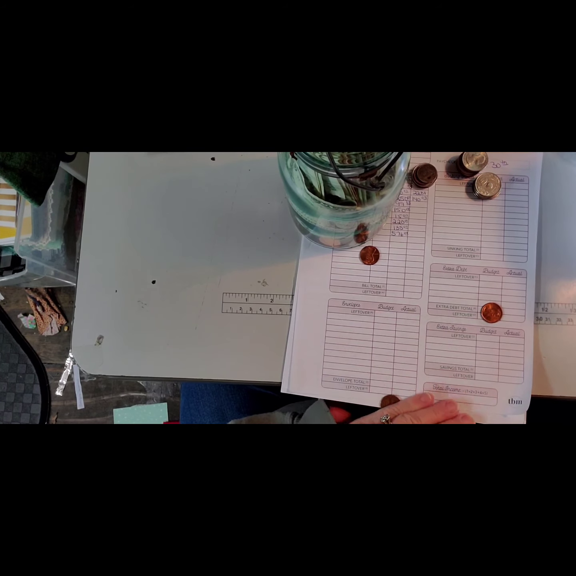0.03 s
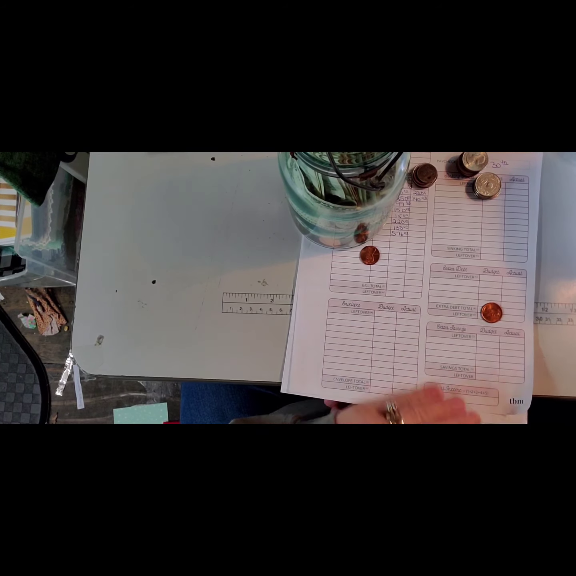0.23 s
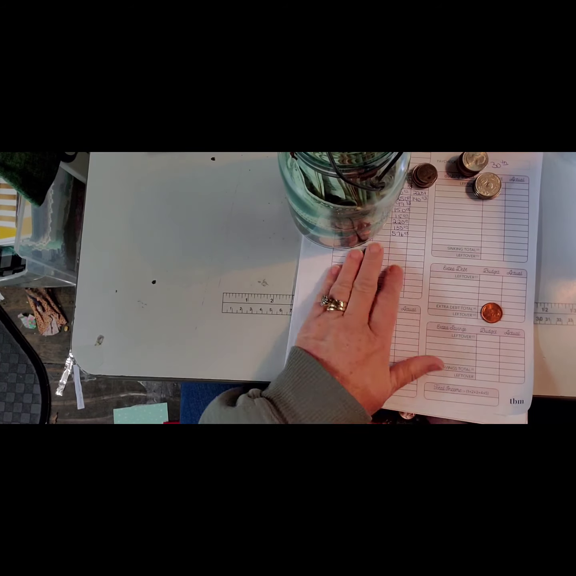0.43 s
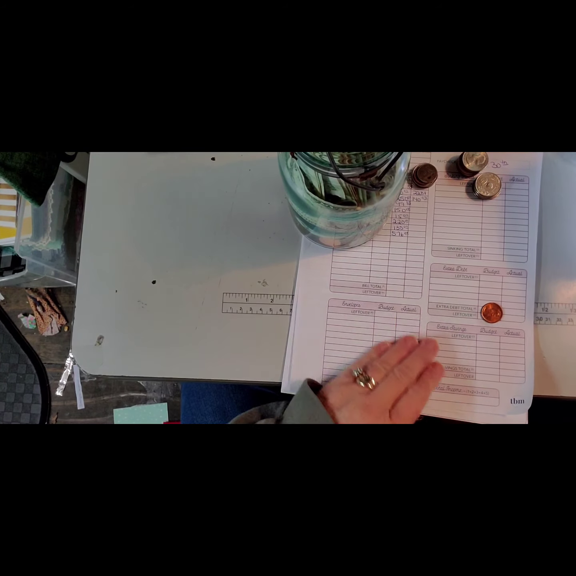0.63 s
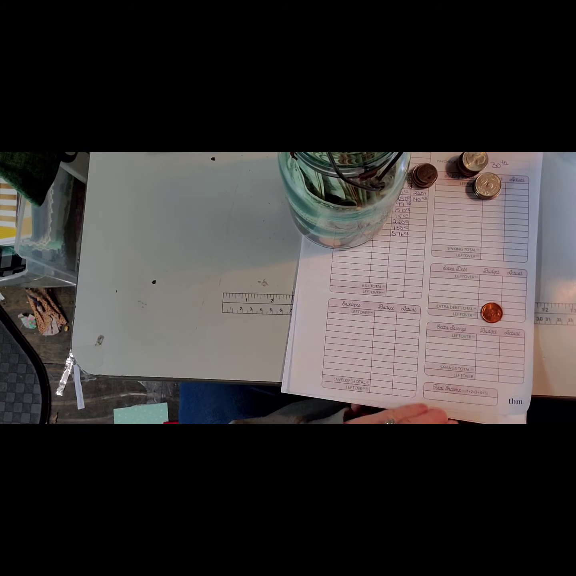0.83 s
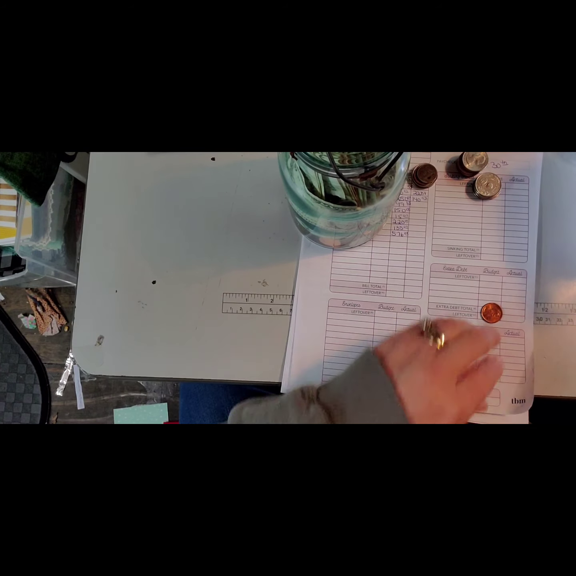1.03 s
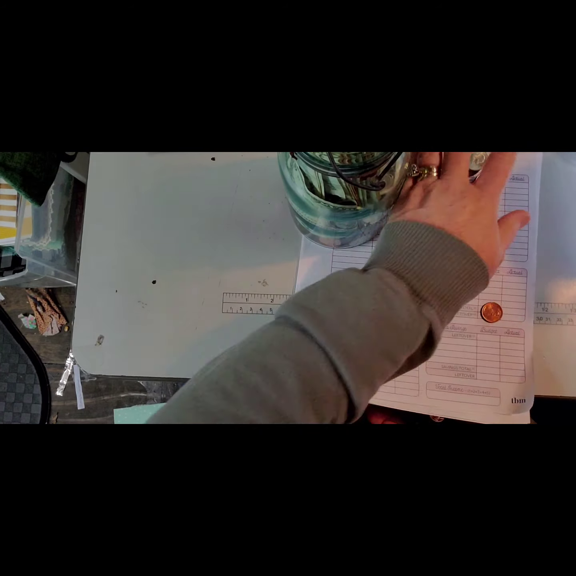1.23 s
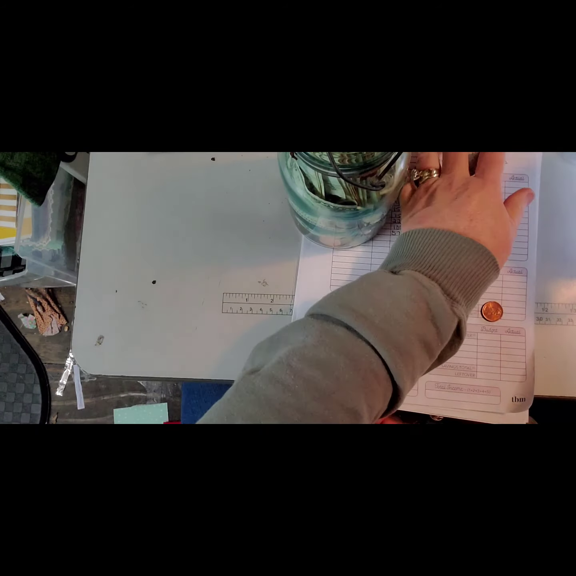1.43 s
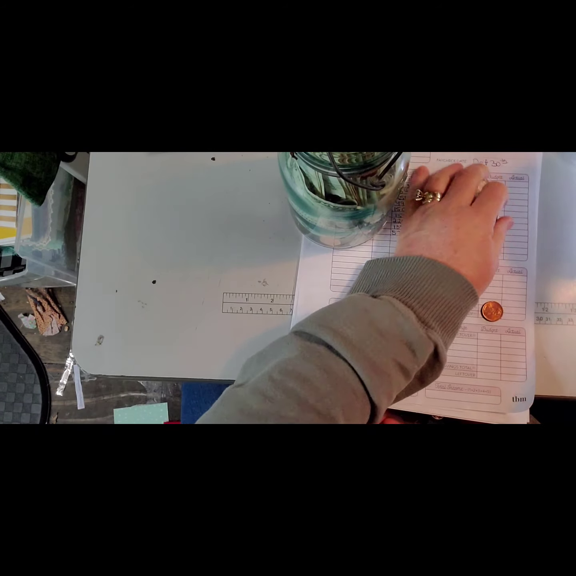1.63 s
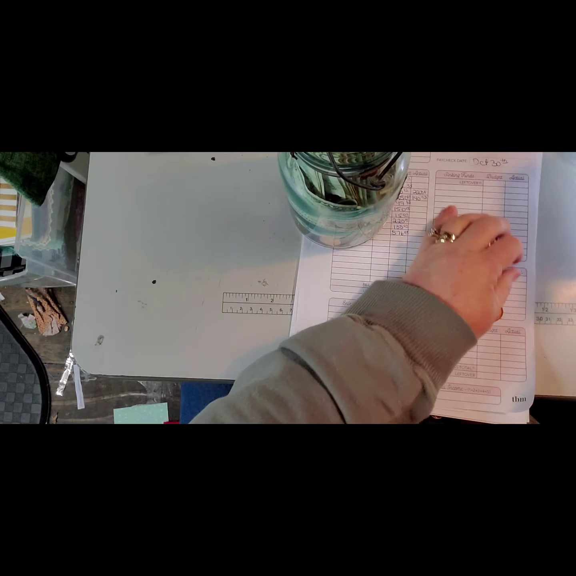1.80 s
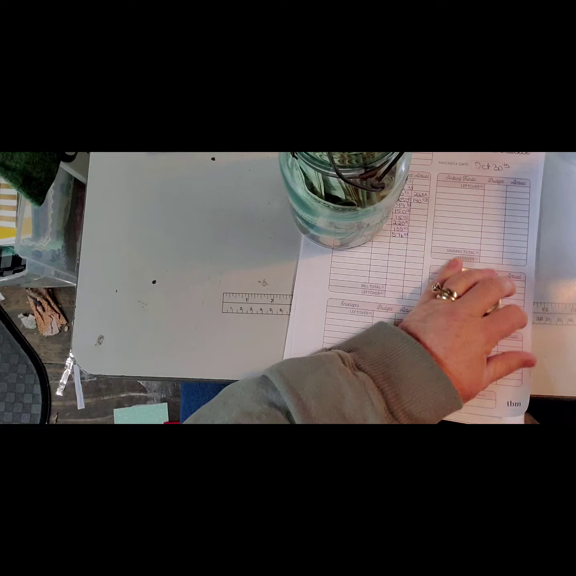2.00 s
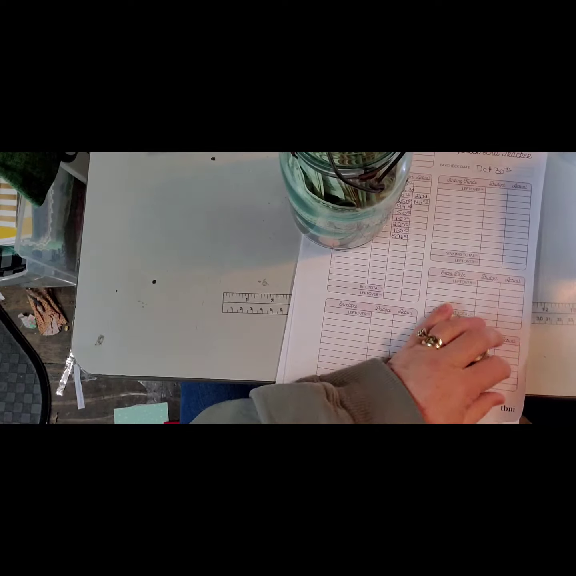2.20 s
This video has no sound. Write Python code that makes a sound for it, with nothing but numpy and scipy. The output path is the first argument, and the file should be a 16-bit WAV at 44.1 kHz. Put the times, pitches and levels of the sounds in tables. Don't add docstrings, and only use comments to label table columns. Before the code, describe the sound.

Coins are raked over paper with bright scraping and clinks, a sleeve brushes back, coins click in the palm, a ring raps a glass jar, then stacked coins slide and topple; close phone microphone, quiet humming room.

```python
import sys
import numpy as np
from scipy import signal
from scipy.fft import rfft, irfft
from scipy.io import wavfile
from scipy.ndimage import uniform_filter1d, minimum_filter1d

SR = 44100
rng = np.random.default_rng(int(sys.argv[2]) if len(sys.argv) > 2 else 0)


def int16_out(signal):
    q = np.round(np.clip(np.atleast_2d(signal).T, -1, 1) * 32767)
    wavfile.write(sys.argv[1], SR, q.astype(np.int16))


def gain_from_decibels(decibels):
    exponent = np.asarray(decibels, float) / 20
    return 10 ** exponent


N = 99577


def evened(x):
    return x / np.sqrt(np.mean(x ** 2) + 1e-20)


def read(points, hz):
    f, value = np.transpose(points)
    return np.interp(np.log(hz + 1), np.log(f + 1), value)


def follow(rows, column=1):
    rows = np.array(rows)
    return np.interp(np.arange(N) / SR, rows[:, 0], rows[:, column])


def pressed(rows, column=1):
    t = np.arange(N) / SR
    touching = (t >= rows[0][0]) * (t <= rows[-1][0])
    return gain_from_decibels(follow(rows, column)) * touching


def add(mix, s, sound):
    part = mix[round(s * SR):][:len(sound)]
    part += sound[:len(part)]


def above(x, hz):
    return signal.sosfilt(signal.butter(2, hz, "high", fs=SR, output="sos"), x)


def coloured(x, colour):
    hz = np.fft.rfftfreq(N, 1 / SR)
    low_end = np.minimum(hz / colour[0][0], 1) ** 4
    return evened(irfft(rfft(x) * gain_from_decibels(read(colour, hz)) * low_end, N))


def resonate(x, hz, width):
    turn = np.exp(2j * np.pi * np.cumsum(hz * np.ones(len(x))) / SR)
    r = np.exp(-np.pi * width / SR)
    return 2 * (turn * signal.lfilter([1 - r], [1, -r], x / turn)).real


def ringing(x, rings):
    total = 0
    for k, (hz, width, db) in enumerate(rings):
        total = total + (-1) ** k * gain_from_decibels(db) * evened(resonate(x, hz, width))
    return evened(total)


def modes(table, detune):
    t = np.arange(6000) / SR
    total = 0
    for (hz, db, t60), d in zip(table, detune):
        total = total + gain_from_decibels(db - 60 * t / t60) * np.sin(2 * np.pi * hz * d * t)
    return total


def slips(per_s, spread_db, smooth, flutter_db):
    size = gain_from_decibels(spread_db * np.minimum(rng.exponential(1, N), 4))
    clicks = size * (rng.random(N) < per_s / SR) * rng.choice([-1, 1], N)
    slow = uniform_filter1d(rng.standard_normal(N), size=300)
    flutter = evened(uniform_filter1d(slow, size=200))
    return evened((evened(clicks) + smooth * rng.standard_normal(N)) * gain_from_decibels(flutter_db * flutter))


def rake():
    # (time [s], edge singing level [dB], scrape level [dB])
    pressure = [(0, -39, -50), (.02, -45, -45.5), (.045, -44.5, -52), (.075, -64, -49), (.105, -53, -46.5),
                (.13, -47, -50.5), (.19, -48, -45.5), (.2, -39.5, -45.5), (.25, -57, -48), (.275, -55, -48),
                (.3, -47.5, -52.5), (.345, -59, -62.5)]
    # (frequency [Hz], level [dB per Hz])
    colour = [(2600, -10), (3200, 9), (9700, -6.5), (15000, -27)]
    # (frequency [Hz], width [Hz], level [dB])
    edge_rings = [(12700, 220, 0), (13500, 220, -3), (14200, 300, -6)]
    # (frequency [Hz], width [Hz], level [dB])
    paper_rings = [(1640, 420, -10), (3400, 1600, -16), (7760, 2600, -1)]
    x = slips(1500, spread_db=3.0, smooth=0.53, flutter_db=2.5)
    paper = ringing(ringing(x, paper_rings), paper_rings)
    scrape = evened(coloured(x, colour) + 0.54 * paper)
    edges = 0
    for hz, width, db in edge_rings:
        bursts = slips(1700, spread_db=-4.5, smooth=0.97, flutter_db=4)
        edges = edges + gain_from_decibels(db) * evened(resonate(bursts, hz, width))
    return pressed(pressure) * evened(edges) + pressed(pressure, column=2) * scrape


def glances(rows):
    table_width, body_width, edge_width = 210, 880, 520
    rise_s, spill = 0.00084, 0.048
    out, t = np.zeros(N), np.arange(3000) / SR
    for (s, db, hz, dying), noise in zip(rows, rng.standard_normal((len(rows), 3000))):
        width = table_width if hz < 2400 else body_width if hz < 11000 else edge_width
        ring = resonate(resonate(noise, hz, width), hz, 2 * width) + spill * np.gradient(noise)
        shape = (1 - np.exp(-t / rise_s)) * np.exp(-t / dying)
        ring_rms = np.sqrt(np.sum((shape * ring) ** 2) / np.sum(shape ** 2))
        add(out, s, gain_from_decibels(db) * shape * ring / ring_rms)
    return out


def clinks(rows, knock_hz):
    # (frequency [Hz], level [dB], decay time T60 [s])
    edge_modes = [(12370, 12.5, 0.003), (13080, 2.5, 0.012), (14100, -1, 0.005)]
    tick_s, tick_db, tick_top_hz = 0.00026, 1, 10450
    ring_s, ring_width = 0.00072, 700
    edge_level_db, edge_rise_s = 0.5, 0.00027
    knock_s, knock_level_db = 0.00084, -1
    out, t = np.zeros(N), np.arange(6000) / SR
    for (s, db, hz, knock_db, edge_db), chance in zip(rows, rng.standard_normal((len(rows), 6003))):
        noise = chance[3:]
        spike = (t == t[4]) * 3
        tick = (noise / 3 + spike) * np.exp(-t / tick_s) * gain_from_decibels(tick_db)
        body = evened(resonate(noise, hz, ring_width)) * np.exp(-t / ring_s) * 1.005
        strike = signal.lfilter(*signal.butter(2, tick_top_hz, fs=SR), tick + body)
        strike = signal.lfilter([1, -1], [1, -.8], strike)
        edge = modes(edge_modes, 1 + 0.0067 * chance[:3]) * gain_from_decibels(edge_level_db + edge_db)
        edge = edge * np.minimum(t / edge_rise_s, 1)
        knock = np.sin(2 * np.pi * knock_hz * t) + np.sin(3 * np.pi * knock_hz * t)
        knock = knock * np.exp(-t / knock_s) * gain_from_decibels(knock_level_db + knock_db)
        add(out, s, gain_from_decibels(db) * (strike + edge + knock))
    return above(out, 1060)


def drag():
    # (time [s], slide level [dB], table level [dB])
    pressure = [(1.537, -102, -69), (1.545, -41, -55.5), (1.58, -62.5, -72), (1.6, -54.5, -62),
                (1.64, -51, -55), (1.68, -55.5, -62), (1.72, -57.5, -68), (1.81, -57, -64),
                (1.826, -51.5, -46.5), (1.95, -59.5, -69), (1.985, -54, -60.5), (2.05, -61, -73.5),
                (2.258, -61, -73)]
    # (frequency [Hz], level [dB per Hz])
    colour = [(2000, -4.5), (4500, -2), (8500, -8), (9500, -15), (10500, -9.5), (13500, -7.5), (15000, -17)]
    # (frequency [Hz], width [Hz], level [dB])
    heap_rings = [(2760, 210, 3.5), (6500, 830, 14), (7900, 270, 10.5)]
    # (frequency [Hz], width [Hz], level [dB])
    table_rings = [(1320, 230, 0.5), (1600, 680, 0)]
    x = slips(1300, spread_db=3.8, smooth=0.91, flutter_db=2.0)
    low = slips(1100, spread_db=1, smooth=0.37, flutter_db=2.0)
    rumble = ringing(ringing(low, table_rings), [(1500, 6100, 0)])
    heap_gain = np.where(np.arange(N) / SR < 1.72, 0.59, 0.067)
    slide = evened(coloured(x, colour) + heap_gain * ringing(x, heap_rings))
    return pressed(pressure) * slide + pressed(pressure, column=2) * rumble


def palm():
    # (time [s], level [dB])
    rattle = [
        (.953, -57),
        (.963, -52),
        (.99, -52),
        (.995, -44),
        (1.03, -70),
        (1.044, -46),
        (1.075, -75.5),
        (1.085, -74),
        (1.105, -99),
    ]
    # (frequency [Hz], level [dB per Hz])
    colour = [(2200, -9), (5500, 10), (8000, 11), (9800, -27), (13000, 4.5)]
    x = slips(2800, spread_db=2.5, smooth=0.83, flutter_db=2.2)
    second_grip = np.arange(N) / SR > 1.02
    low = evened(np.gradient(resonate(x, 1030, 410))) * second_grip
    return pressed(rattle) * (coloured(x, colour) + 1.9 * low)


def jar():
    # (frequency [Hz], level [dB], decay time T60 [s])
    glass = [(2542, -0.5, 0.026), (2980, -22, 0.028), (3820, -9.5, 0.026), (4320, -18.5, 0.039),
             (4765, -3.5, 0.041), (5720, -4.5, 0.018), (5800, -0.5, 0.032), (6330, -25, 0.025),
             (7300, -16, 0.032), (8470, -2.5, 0.022), (8800, -19, .02), (10500, -18.5, .025),
             (12500, -15, 0.015), (13100, -24, 0.02)]
    # (time [s], peak level [dB], hardness as low-pass frequency [Hz])
    taps = [
        (1.274, -50, 3000),
        (1.278, -63, 3000),
        (1.2911, -38, 3500),
        (1.296, -20.5, 14000),
    ]
    crack_db, crack_s, rise_s = -1.5, 0.0033, 0.00053
    out, t = np.zeros(N), np.arange(6000) / SR
    ring = modes(glass, np.ones(len(glass))) * np.minimum(t / rise_s, 1)
    for (s, db, hard_hz), noise in zip(taps, rng.standard_normal((len(taps), 6001))):
        crack = gain_from_decibels(crack_db) * noise[1:] / 2 * np.exp(-t / crack_s)
        add(out, s, gain_from_decibels(db) * signal.lfilter(*signal.butter(2, hard_hz, fs=SR), ring + crack))
    return above(out, 1840)


def cloth():
    # (time [s], level [dB], cavity resonance [Hz])
    sweep = [
        (.525, -76, 1900),
        (.55, -57, 1700),
        (.7, -58, 2190),
        (.8, -62.5, 2830),
        (.95, -76, 2780),
    ]
    # (frequency [Hz], level [dB per Hz])
    sweep_colour = [(1100, -21), (2240, -11), (6000, -15), (10000, -16.5), (15000, -19.5)]
    # (time [s], level [dB])
    reach = [
        (1.22, -77),
        (1.24, -75),
        (1.33, -63),
        (1.42, -67),
        (1.445, -83),
    ]
    # (frequency [Hz], level [dB per Hz])
    reach_colour = [(1500, -6), (3000, 10.5), (6000, -1), (10000, -14)]
    x = slips(6000, spread_db=2.0, smooth=3.1, flutter_db=1.1)
    hollow = evened(resonate(x, follow(sweep, column=2), 370))
    sleeve = evened(coloured(x, sweep_colour) + 0.24 * hollow)
    return pressed(sweep) * sleeve + pressed(reach) * coloured(x, reach_colour)


def arm():
    start_s, rise_s, hz = 1.55, 0.56, 243
    rub = evened(resonate(resonate(rng.standard_normal(N), hz, 174), hz, 150))
    return gain_from_decibels(-68) * rub * np.clip((np.arange(N) / SR - start_s) / rise_s, 0, 1)


def ports(x, lag, pan_db):
    # (frequency [Hz], left minus right [dB])
    tilt = [(500, 1), (2000, 1.5), (4000, 0), (8000, -3.5), (12000, 0)]
    scatter_rad = .7
    hz = np.fft.rfftfreq(N, 1 / SR)
    uneven = uniform_filter1d(rng.standard_normal(len(hz)), size=900)
    uneven = evened(uniform_filter1d(uneven, size=600))
    phase = np.pi * hz * lag / SR + scatter_rad * hz / 10000 * uneven
    half = gain_from_decibels((read(tilt, hz) + pan_db) / 2) * np.exp(1j * phase)
    return irfft(rfft(x) * np.array([half, 1 / half]), N)


def room(x):
    # (frequency [Hz], decay time T60 [s])
    decay = [(500, 0.19), (4000, 0.083), (14000, 0.075)]
    taps = np.zeros((2, SR // 2))
    at = np.arange(100, SR // 2 - 20, 20)
    at = at + rng.integers(0, 20, (2, len(at)))
    np.put_along_axis(taps, at, rng.choice([-1., 1.], at.shape), 1)
    hz, t, z = signal.stft(taps, SR, nperseg=256)
    tail = signal.istft(z * gain_from_decibels(-60 * t / read(decay, hz)[:, None]), SR, nperseg=256)[1]
    return signal.fftconvolve(x[None], tail / np.linalg.norm(tail[0]), axes=1)[:, :N]


def air():
    # (frequency [Hz], level [dB per Hz])
    colour = [(25, -22), (40, 0.5), (97, -13.5), (253, -17), (400, -20.5), (700, -28), (7000, -34.5),
              (10000, -46), (13000, -43)]
    # (frequency [Hz], left-right coherence [0 to 1])
    likeness = [(60, 0.86), (250, 0.69), (2000, 0.085)]
    hum_hz, hum_width = 79, 15.3
    hz = np.fft.rfftfreq(N, 1 / SR)
    a, b = rfft(rng.standard_normal((2, N)))
    same = np.clip(read(likeness, hz), -1, 1)
    z = np.array([a, same * a + np.sqrt(1 - same ** 2) * b]) * gain_from_decibels(read(colour, hz))
    noise = irfft(z, N) / np.std(irfft(z[0] * (hz > 100), N))
    hum = evened(resonate(resonate(rng.standard_normal(N), hum_hz, hum_width), hum_hz, hum_width))
    return gain_from_decibels(-68.5) * noise + gain_from_decibels(-63) * hum


def scene():
    # (time [s], peak [dB], loudest ring [Hz], knock re peak [dB], edge ring re peak [dB])
    low_knock_clinks = [
        (0.0786, -15, 4350, -50, -15),
        (0.9619, -19, 6330, -56, -10.5),
        (1.0449, -22, 6640, -1, -25),
        (1.046, -26, 4500, -15, -30),
        (1.084, -40, 5600, -36, -22),
    ]
    high_knock_clinks = [
        (0.494, -55.5, 4040, 6, -37),
        (1.1723, -48.5, 4210, -1.5, -43),
        (1.8243, -25.5, 5720, -35, -10.5),
        (1.9772, -38, 4970, -6, -4.5),
        (2.005, -42, 5100, -31, -3),
        (2.1485, -38.5, 5200, -54, 2),
    ]
    # (time [s], level [dB], ring [Hz], decay constant [s])
    rake_glances = [(.0112, -38, 5200, .003), (.0115, -41, 12500, 0.0049), (.0175, -30, 12460, .007),
                    (.018, -44, 5050, 0.0067), (.029, -44, 12900, 0.0033), (.083, -50, 12900, .003),
                    (.1003, -43, 6060, 0.0023), (.1015, -33, 12750, 0.0066), (.105, -42, 5600, 0.0027),
                    (.136, -52, 12600, 0.0044), (.1415, -39.5, 3560, 0.004), (.174, -36, 8040, 0.00067),
                    (.1745, -47, 13100, 0.0014), (.1955, -30, 7900, .002), (.1995, -27.5, 7900, 0.0016),
                    (.201, -32, 14000, .01), (.2045, -15.5, 7700, 0.00069), (.220, -30.5, 6660, 0.0018),
                    (.229, -31.5, 13270, 0.0072), (.239, -33, 7700, .002), (.241, -31, 12900, 0.0087),
                    (.2555, -23, 7200, .0015), (.262, -18, 7200, 0.00072), (.2622, -41, 3630, 0.0012),
                    (.263, -23, 12900, .003), (.267, -39, 12700, .004), (.272, -24.5, 7500, 0.0014),
                    (.273, -26.5, 12800, 0.0043), (.286, -45, 13350, 0.0081)]
    palm_glances = [(.956, -43, 6840, .001), (.9665, -44, 7040, 0.0016), (.972, -50, 5740, 0.0016),
                    (.983, -47, 5600, .001), (.9945, -37.5, 8200, .003), (.9945, -40.5, 5630, 0.0043),
                    (.9945, -37, 13100, .007), (1.039, -32.5, 3000, 0.0028), (.9616, -26.5, 8100, 0.0012),
                    (.9614, -43, 2930, 0.00065), (.9625, -36.5, 13000, 0.0094), (1.050, -45, 5000, .003),
                    (1.084, -50, 12900, 0.0022)]
    drag_glances = [(1.543, -54, 7900, .003), (1.5483, -38.5, 6400, 0.0043), (1.552, -51, 7900, .003),
                    (1.553, -34.5, 6500, .002), (1.564, -58, 7900, 0.0021), (1.589, -68, 7760, 0.0013),
                    (1.598, -45, 7200, 0.0053), (1.611, -48, 1350, 0.0036), (1.633, -43, 6300, 0.0037),
                    (1.634, -47, 1350, 0.0026), (1.651, -37.5, 6000, 0.0024), (1.665, -33, 6600, 0.0019),
                    (1.6695, -39, 6500, 0.0027), (1.684, -48.5, 1350, 0.0037), (1.6975, -33, 6300, 0.0017),
                    (1.702, -41, 6800, .002), (1.749, -42, 8200, 0.0025), (1.824, -45, 1540, 0.0026),
                    (1.836, -49, 1350, 0.016), (1.9775, -44.5, 1850, 0.0066), (2.1024, -45, 2280, 0.0014)]
    # (left lead [samples], left minus right [dB])
    rake_place, hand_place = (0.58, 0.3), (1.33, 3.2)
    jar_place, drag_place = (1.38, -.4), (5.51, 2.6)
    low_knocked = clinks(low_knock_clinks, knock_hz=944)
    raking = np.arange(N) < SR // 2
    rake_clink = above(above(low_knocked * raking, 4100), 4100)
    parts = [(rake() + rake_clink, *rake_place),
             (cloth() + palm() + low_knocked * ~raking, *hand_place),
             (jar(), *jar_place),
             (drag() + arm() + clinks(high_knock_clinks, knock_hz=1280), *drag_place),
             (glances(rake_glances), *rake_place),
             (glances(palm_glances), *hand_place),
             (glances(drag_glances), *drag_place)]
    direct = sum(ports(*part) for part in parts)
    echo = room(above(sum(part[0] for part in parts), 2540))
    return direct + gain_from_decibels(-6) * echo + air()


def roll_off(x):
    return signal.sosfilt(signal.butter(12, 15250, fs=SR, output="sos"), x)


def record(dry):
    # (start [s], end [s])
    duck_spans = [
        (.035, .062),
        (.088, .16),
        (.195, .262),
        (.298, .33),
    ]
    duck_db, duck_from_db = -20, -56
    hz, t, z = signal.stft(dry, SR, nperseg=1024)
    bright_db = 10 * np.log10(np.mean(abs(z[:, hz > 10000]) ** 2, (0, 1)) * 400 + 1e-12)
    hold = np.clip((minimum_filter1d(bright_db, size=3) - duck_from_db) / 6, 0, 1)
    band = (hz > 330) & (hz < 2600) & (abs(hz - 1700) > 240)
    patches = sum((t > a) & (t < b) for a, b in duck_spans)
    gain = gain_from_decibels(duck_db * hold * band[:, None] * patches)
    clean = signal.istft(z * gain, SR, nperseg=1024)[1][:, :N]
    low_pass = signal.firwin(127, 14650, window=("kaiser", 5), fs=SR)
    return roll_off(signal.oaconvolve(clean, low_pass[None], "same"))


dry = scene()
out = record(dry)
int16_out(out)
```